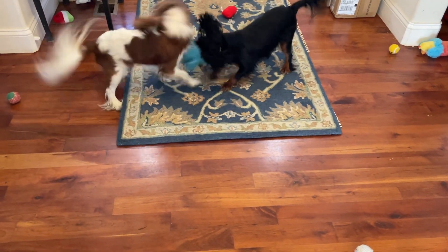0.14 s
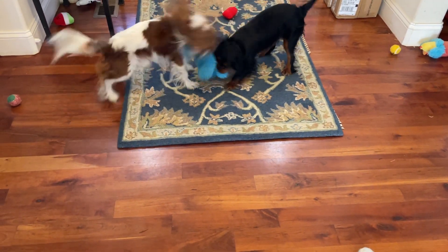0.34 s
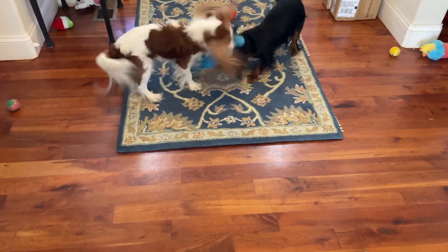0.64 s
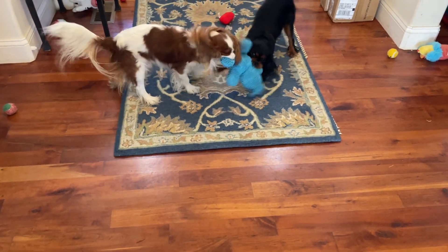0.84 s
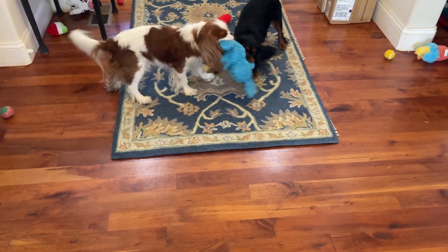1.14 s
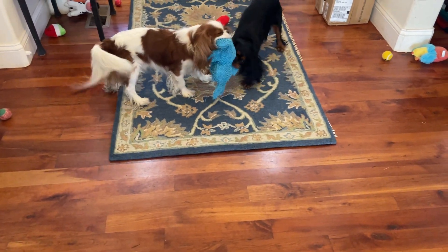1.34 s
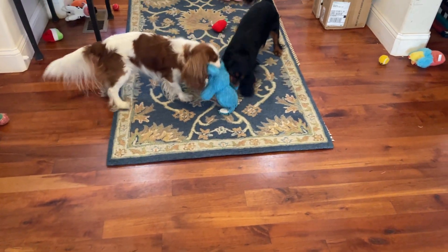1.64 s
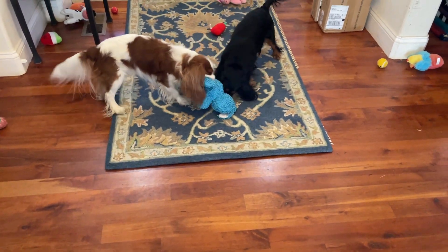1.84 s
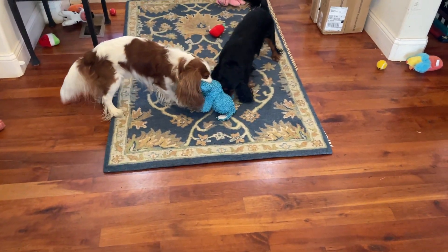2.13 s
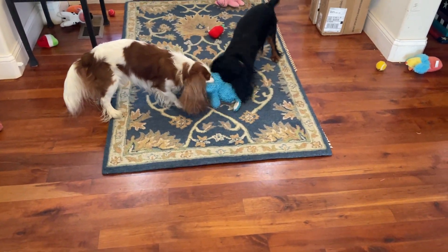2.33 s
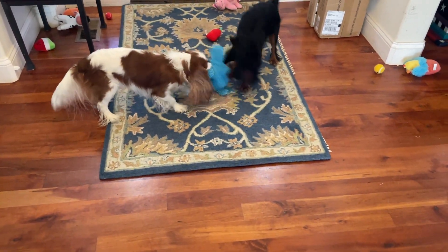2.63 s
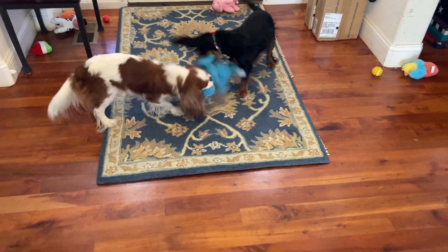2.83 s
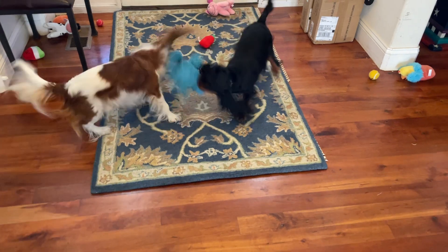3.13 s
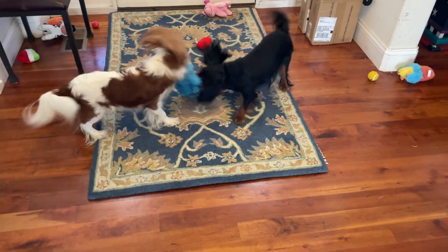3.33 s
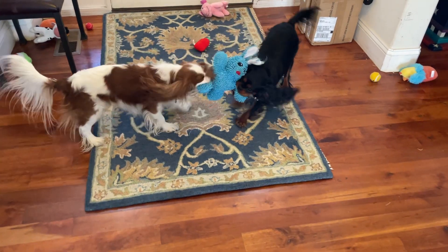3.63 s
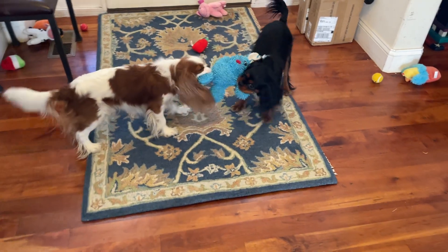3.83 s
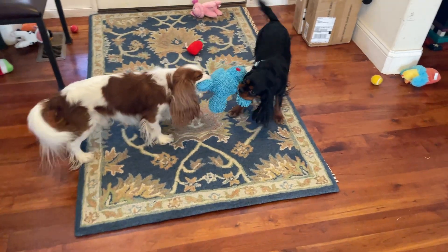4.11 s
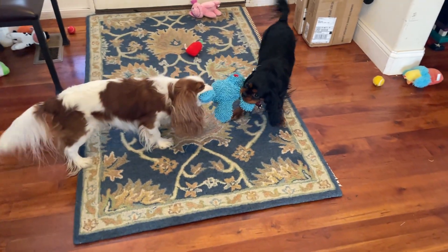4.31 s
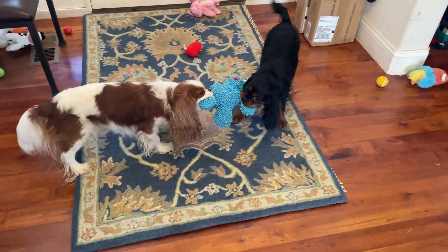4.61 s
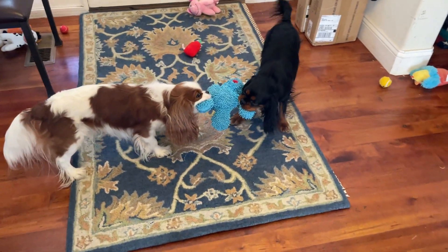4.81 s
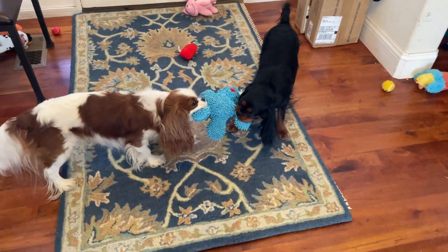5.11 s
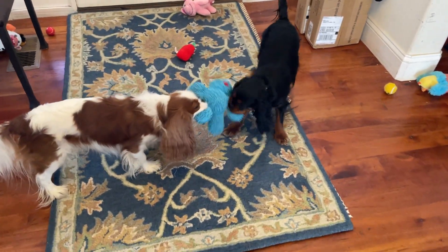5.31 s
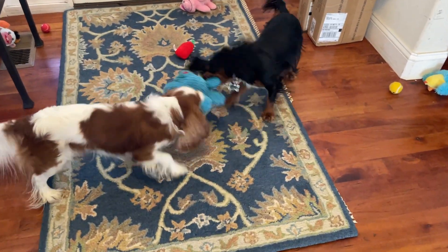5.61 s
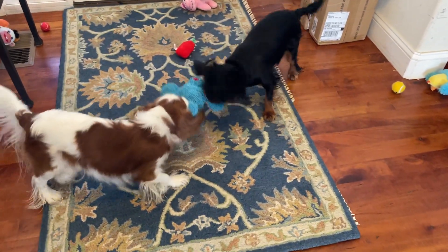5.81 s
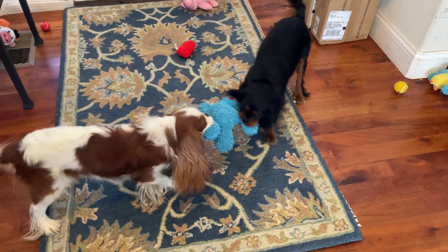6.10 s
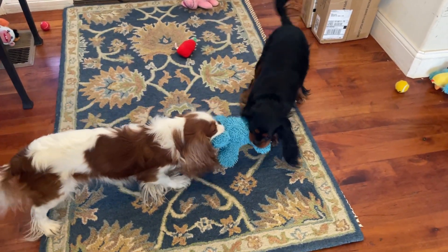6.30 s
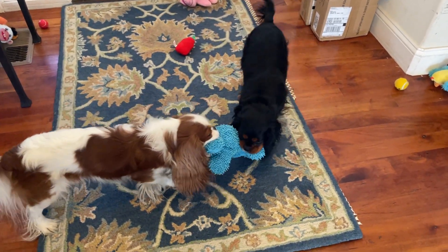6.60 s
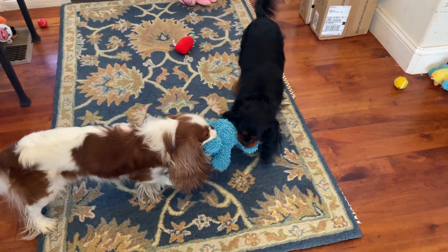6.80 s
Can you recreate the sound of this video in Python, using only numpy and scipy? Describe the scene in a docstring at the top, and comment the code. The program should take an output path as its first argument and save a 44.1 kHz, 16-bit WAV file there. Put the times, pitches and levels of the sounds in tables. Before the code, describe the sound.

Two small dogs play tug in a living room, heard from a few steps away with short room echo and faint low room tone. From 0 to 0.8 s, brisk rustling, bright collar-tag jingles, paw thumps and claw scuffs accompany short, rough, muffled growls. A lower throbbing growl runs from about 1.1 to 1.6 s with little movement, then a brief lull. Small grunts return at 2.2 to 2.6 s. Around 2.7 to 3.7 s comes the most vigorous tugging: strong raspy growls, a heavy soft thump, a sharp tag clash near 3.1 s and more rustle. From 3.9 to 4.7 s the growl is faint and low, followed by soft thumps and tiny claw taps and a near pause. Short growls resume at 5.3 s, then loud, sustained, throbbing growls from 5.7 to 6.6 s with jingles near 5.7 to 6.2 s, ending in weaker low grumbles.

```python
"""In a living room, two small dogs tug at a plush toy on a rug over a wooden floor.
One growls in long, low, throbbing bouts through a mouthful of toy: a chest tone and ragged slaps ring throat resonances.
As they shake their heads, metal collar tags jingle as decaying modes, and fur and plush rustle as grainy noise.
Paws thump as short low sines; claws tick, knock and scuff as brief noise bursts. Room tone and echo surround them."""
import sys
import numpy as np
from scipy import signal
from scipy.fft import rfft, irfft
from scipy.io import wavfile
from scipy.ndimage import uniform_filter1d

SR = 44100
rng = np.random.default_rng(int(sys.argv[2]) if len(sys.argv) > 2 else 0)


def dump(signal):
    """Clip the signal to [-1, 1] and save it as 16-bit WAV at the path in sys.argv[1]."""
    limited = np.clip(np.atleast_2d(signal).T, -1, 1)
    pcm = np.round(limited * 32767).astype(np.int16)
    wavfile.write(sys.argv[1], SR, pcm)


N = 306495


def from_db(db):
    """Decibels to gain."""
    return 10 ** (np.asarray(db) / 20)


def rms_one(x):
    """Scale to unit rms."""
    return x / np.sqrt(np.mean(x ** 2) + 1e-20)


def evened(x):
    """Hold a sound at a steady rms of 1."""
    return x / np.sqrt(np.abs(uniform_filter1d(x * x, size=1500)) + 1e-12)


def in_time(rows):
    """Each column of a curve at every sample."""
    s, *columns = np.transpose(rows)
    return [np.interp(np.arange(N) / SR, s, column) for column in columns]


def at_hz(points, hz):
    """Read a table on a log-frequency axis."""
    table_hz, values = np.transpose(points)
    return np.interp(np.log(hz), np.log(table_hz), values)


def drift(rate):
    """Smooth chance with about `rate` turns a second; spread 1."""
    step = 40   # samples between computed points
    r = np.exp(-2 * np.pi * step * rate / SR)
    white = rng.standard_normal(N // step + 2002)
    slow = signal.lfilter([1], [1, -2 * r, r * r], white)[2000:]
    return np.interp(np.arange(N) / step, np.arange(len(slow)), rms_one(slow))


def band(x, low, high, order=2):
    """Butterworth band-pass."""
    edges = [max(low, 10), min(high, .45 * SR)]
    return signal.sosfilt(signal.butter(order, edges, "band", fs=SR, output="sos"), x + 1e-18)


# Left-right likeness of diffuse sound: (frequency [Hz], correlation [-1 to 1])
LIKENESS = [(40, 1), (160, 0.85), (330, 0.64), (700, 0.37), (1500, 0.2), (3000, 0.56), (6000, -0.077),
            (16000, 0.48)]


def diffuse_bands(size, count=20):
    """Half-octave bands of stereo noise, alike on both sides in the bass: (Hz, noise)."""
    edges = 22 * 2 ** (np.arange(count + 1) / 2)
    white = rng.standard_normal((2, 2, size + 8000))
    for k, (low, high) in enumerate(zip(edges, edges[1:])):
        # neighbouring bands use different noise
        mid, side = band(white[k % 2], low, high)[:, -size:]
        hz = np.sqrt(low * high)
        alike = np.clip(at_hz(LIKENESS, hz), -1, 1)
        yield hz, np.sqrt(1 + alike) * mid + np.sqrt(1 - alike) * side * [[1], [-1]]


def coloured(spectrum, patchy_db, count=20):
    """Stereo noise of a given colour, each band swelling on its own; rms 1."""
    total = np.zeros((2, N))
    for hz, noise in diffuse_bands(N, count):
        total += from_db(at_hz(spectrum, hz) + patchy_db * drift(23)) * noise
    return rms_one(total)


def add(track, s, sound):
    """Mix a short sound in at time s."""
    start = max(round(s * SR), 0)
    track[start:start + len(sound)] += sound[:N - start]


# Colour of the room tone: (frequency [Hz], relative density [dB per Hz])
AIR = [(15, -36), (25, 2.5), (53, 3.5), (80, -4), (223, -2), (734, -20.5), (988, -13.5), (1290, -23),
       (3620, -30.5), (4490, -32.5), (6740, -36.5), (9320, -38.5), (16000, -52)]


def room_tone(level_db=-69):
    """Steady, mostly low room noise whose bands swell slightly."""
    return from_db(level_db) * coloured(AIR, patchy_db=2.5)


# One growl per push of air: (start [s], length [s], rise after the start [s], chest level [dB],
# fade [dB], roughness [0-1, clipped], open mouth re chest [dB], snarl re chest [dB],
# muzzle rasp re chest [dB], vowel at the start [Hz]); the part levels are trimmed in growl()
GROWLS = [(0, 0.13, 0.012, -55.5, -6.5, 0.88, -4, -10.5, -38, 353),
          (0.227, 0.11, 0.022, -38.5, 7, 0.58, -4, -9, -24, 318),
          (0.326, 0.091, 0.018, -45, -1, 0.68, -1, -15, -18.5, 320),
          (0.385, .14, 0.04, -40.5, -2.5, 0.24, -9.5, -10.5, -21.5, 440),
          (0.58, 0.23, 0.035, -46.5, 15, 0.56, -9, -15.5, -33, 450),
          (1.061, 0.13, 0.027, -44, -1, 0.34, -4, -11.5, -47, 840),
          (1.18, 0.088, 0.035, -41.5, 0, 0.55, -8, -10.5, -38.5, 630),
          (1.312, 0.3, 0.037, -44, 2, 0.44, -7.5, -15, -46, 740),
          (2.168, 0.14, 0.063, -54.5, -7, 0.25, -8.5, -15.5, -26.5, 380),
          (2.406, 0.049, 0.032, -46, 0, .2, -1.5, -9, -27, 391),
          (2.511, 0.045, .025, -49, 0, 0.42, -6, -8, -20.5, 380),
          (2.713, 0.16, 0.12, -35, 0.5, 0.63, -5, -8.5, -30.5, 546),
          (2.849, 0.09, 0.093, -37, 2.5, 0.42, 4, -7, -40, 710),
          (2.943, 0.035, 0.061, -43, 0, 0.53, 7.5, -16, -41, 402),
          (3.025, 0.099, 0.042, -44, -1, 1.1, -7, -11, -37, 354),
          (3.145, .16, 0.04, -32, 9, 0.22, -7, -9.5, -28.5, 460),
          (3.297, 0.38, 0.068, -43, -0.5, .55, -8, -9, -49, 480),
          (3.899, .18, 0.029, -54.5, 5, .35, -3, -10, -19, 439),
          (4.079, 0.23, 0.032, -52.5, -0.5, .35, -15.5, -16.5, -45.5, 466.4),
          (4.314, .35, 0.042, -56.5, 0.5, 0.19, -16, -19, -35, 407),
          (5.289, 0.068, 0.046, -39, 0.5, 0.49, -9, -7, -27, 342.8),
          (5.429, 0.077, .042, -44, -1.5, 0.58, -4.5, -6, -19.5, 329.6),
          (5.675, 0.38, 0.054, -32, 7.5, 0.3, -7, -11.5, -38.5, 789.2),
          (6.051, 0.034, .027, -39.5, -1.5, 0.62, -4.5, -3.5, -28.5, 710),
          (6.103, 0.15, 0.049, -34.5, -1, 0.47, -10, -12, -36, 730),
          (6.27, 0.36, 0.037, -34, 3.5, 0.21, -12.5, -15, -36, 520),
          (6.709, 0.068, .03, -44.5, 1, 0.4, -11.5, -18.5, -56, 800.5),
          (6.813, 0.097, 0.021, -45, 2.5, 0.27, -12, -16.5, -54, 878)]
# Pitch glide, one list per bout of growling: (time [s], pitch [Hz])
PITCH = [
    [(0.05, 176.6), (0.104, 197.1), (0.23, 200.7), (0.324, 191.8), (0.538, 199.7), (0.606, 172.6),
     (0.646, 193.5), (0.75, 193.7)],
    [(1.07, 136), (1.33, 130.5), (1.372, 125.7), (1.478, 140.5), (1.53, 124.7), (1.6, 140.3), (1.64, 128.7),
     (1.72, 127.7)],
    [(2.18, 157), (2.294, 167.4), (2.334, 156.5), (2.372, 159), (2.422, 187.4), (2.522, 208.8),
     (2.562, 195.4), (2.6, 195.8)],
    [(2.73, 191.3), (2.794, 195.2), (2.902, 223.9), (2.998, 199.3), (3.442, 195.2), (3.638, 162.5),
     (3.67, 139.4), (3.78, 139.3)],
    [(3.9, 144.2), (4.004, 144.2), (4.052, 163.9), (4.118, 160.7), (4.152, 140.4), (4.228, 141),
     (4.294, 150.8), (4.54, 139.6)],
    [(5.3, 180.5), (5.326, 182.1), (5.354, 193.5), (5.378, 198.2), (5.414, 198.2), (5.438, 208.5),
     (5.518, 181.6), (5.56, 183.3)],
    [(5.68, 178.9), (5.812, 179.5), (5.934, 163), (6.032, 158.3), (6.056, 155.5), (6.116, 155.4),
     (6.16, 180.7), (6.23, 183.4)],
    [(6.3, 152), (6.318, 150.4), (6.662, 145.7), (6.706, 135.4), (6.774, 132.6), (6.87, 141.1),
     (6.908, 125.5), (6.94, 122.8)],
]
ONSET_DB, RELEASE_DB_PER_S = 15.5, 187   # a growl swells from this far down, and dies at this rate
LIPS_SLACKEN_DB = 2   # the snarl and rasp weaken by this much over a growl
JAW_OCTAVES_PER_S = 0.56   # the vowel darkens as the jaw closes on the toy


def growl_controls():
    """Each growl swells, changes level while held and dies away; pitch glides and the jaw slowly closes."""
    t = np.arange(0, N / SR, .002)
    columns = np.transpose(GROWLS)[:, :, None]
    start, length, rise, db, fade, rough, mouth_db, snarl_db, muzzle_db, vowel_hz = columns
    age = np.clip(t - start, 0, length)
    onset = np.maximum(1 - (t - start) / rise, 0)
    overtime = np.maximum(t - start - length, 0)
    effort_db = -ONSET_DB * onset ** 2 - fade * age / length - RELEASE_DB_PER_S * overtime
    power = from_db(db + effort_db) ** 2 + 1e-20
    # the lips are drawn back at first and slacken towards the end
    lips_db = LIPS_SLACKEN_DB * (.5 - age / length)
    parts_db = (0, mouth_db, snarl_db + lips_db, muzzle_db + lips_db)
    levels = [np.sqrt(np.sum(power * from_db(part_db) ** 2, axis=0)) for part_db in parts_db]
    pitch = np.interp(t, *np.vstack(PITCH).T)
    jaw_hz = vowel_hz * 2 ** (-JAW_OCTAVES_PER_S * age)
    # where growls run into each other, the stronger one shapes the voice
    shape = [np.average(np.broadcast_to(control, power.shape), axis=0, weights=power)
             for control in (np.clip(rough, 0, 1), jaw_hz)]
    return in_time(np.transpose([t, *levels, pitch, *shape]))


def throat(source, resonances, top_hz):
    """Resonances in parallel with a steep fall above, evened to a steady rms of 1."""
    x = np.zeros(N)
    for hz, width, db in resonances:
        x += from_db(db) * band(source, hz - width / 2, hz + width / 2)
    return evened(signal.sosfilt(signal.butter(6, min(top_hz, .4 * SR), fs=SR, output="sos"), x))


def jaw_resonance(source, jaw_hz, width_hz=230):
    """One resonance that glides with the opening of the jaw, at a steady level."""
    turn = np.exp(2j * np.pi * np.cumsum(jaw_hz) / SR)
    r = np.exp(-np.pi * width_hz / SR)
    # shift the resonance to zero frequency, smooth there, and shift back
    smoothed = signal.lfilter([(1 - r) ** 2], [1, -2 * r, r * r], source / turn)
    return evened(np.real(turn * smoothed))


# Throat resonances, the muzzle's being faint and high:
# (centre [Hz], width [Hz], level within its group [dB])
CHEST = [(223, 93.6, 0)]
MOUTH = [(299.6, 50, 13), (456, 374, 10), (640, 180, -12.5), (802, 530, 5), (883, 620, -8)]
SNARL = [(1290, 150, -10), (1233, 393, 12), (1500, 170, -8)]
MUZZLE = [(1894, 298, 1.5), (2942, 640, 3), (5370, 1900, -7.5)]
# scale of the closure scatter, the turbulence per slap, and the buzz beside the chest tone
JITTER_CYCLES, BREATHINESS, CHEST_BUZZ = .11, 1.5, .42


def growl(chest, mouth, snarl, muzzle, pitch, rough, jaw_hz,
          waver=.008, throb_hz=25, throb=0.55, wobble=1.0, shimmer_db=5, limp=0.93,
          break_up_db=4, mouth_db=-4, jaw_db=-7, snarl_db=-2, muzzle_db=-1):
    """Slack folds flap unevenly: a throbbing chest tone, and a ragged train of slaps that rings the throat."""
    # closures come a little early or late around the gliding pitch
    glide = np.cumsum(pitch * (1 + waver * drift(12))) / SR
    cycles = np.maximum.accumulate(glide + 1 + JITTER_CYCLES * rough * drift(45))
    closures = cycles.astype(int)
    # loose tissue above the folds flutters and swells the flow in throbs
    flutter = 2 * np.pi * np.cumsum(throb_hz * (1 + 0.3876 * drift(9.95))) / SR
    swell = 1 + np.sqrt(rough) * throb * np.sin(flutter) + 0.18 * rough * drift(58)
    tone = np.sin(2 * np.pi * cycles + wobble * rough * np.cos(flutter)) * swell
    tone = tone / np.sqrt(uniform_filter1d(tone * tone, size=3000))
    # strong and weak closures alternate, each with a puff of turbulence
    chance = np.clip(rng.standard_normal(N), -2, 2)[closures]
    alternation = 1 + limp * np.sqrt(rough) * (-1) ** closures
    strength = from_db(shimmer_db * rough * chance) * alternation * swell
    puff = np.exp(-(cycles % 1) / 0.66) * rng.standard_normal(N) * np.sqrt(8 * pitch / SR)
    slaps = strength * (np.diff(closures, prepend=0) + BREATHINESS * (.1 + rough) * puff)
    buzz = CHEST_BUZZ * (.5 + rough) * throat(slaps, CHEST, top_hz=642)
    low = chest * (from_db(-break_up_db * rough) * tone + buzz)
    open_mouth = from_db(mouth_db) * throat(slaps, MOUTH, top_hz=1320)
    vowel = mouth * (open_mouth + from_db(jaw_db) * jaw_resonance(slaps, jaw_hz))
    snarling = snarl * from_db(snarl_db) * throat(slaps, SNARL, top_hz=1520)
    rasp = muzzle * from_db(muzzle_db) * throat(slaps, MUZZLE, top_hz=8230)
    return low, vowel + snarling + rasp


# Tugs and head shakes, levels before trims: (start [s], length [s], rustle [dB], tag jingle [dB],
# floor rumble [dB])
TUGS = [(0, 0.7, -53.5, -56, -58), (0.806, 0.096, -65, -59.5, -68), (1.033, 0.71, -83, -82, -69),
        (2.254, 0.16, -83, -108, -70), (2.386, 0.15, -74, -104, -58.5), (2.62, 0.18, -59.5, -53.5, -55.5),
        (2.864, 0.48, -54, -73, -49), (3.474, 0.3, -61.5, -66.5, -59), (3.858, 0.19, -70.5, -96, -62),
        (4.157, 0.43, -86, -106, -62), (4.83, 0.13, -79, -99, -68.5), (5.318, 0.24, -74, -105, -57.5),
        (5.572, 0.37, -65, -55, -66), (6.159, 0.36, -73.5, -72.5, -73)]
TUG_RISE_S, TUG_SETTLE_S = 0.0099, 0.075   # a tug builds up and settles
TUG_UNEVEN_DB, TUG_JERKS_PER_S = 2.5, 7.6   # and is jerky while it lasts


def tugging():
    """Strength of rustle, jingle and floor rumble: each tug builds up, jerks about and settles."""
    t, strength = np.arange(N) / SR, np.zeros((3, N))
    for s, length, *db in TUGS:
        build_up = np.clip((t - s) / TUG_RISE_S + 1, 0, 1)
        settle = np.exp(-np.maximum(t - s - length, 0) / TUG_SETTLE_S)
        strength += from_db(db)[:, None] * build_up * settle
    return strength * from_db(TUG_UNEVEN_DB * drift(TUG_JERKS_PER_S))


# Colours of the rubbing and of the deep rumble: (frequency [Hz], relative density [dB per Hz])
RUSTLE = [(300, 5), (900, -2.5), (1800, -6), (2600, -7.5), (4500, -5.5), (7000, -10), (10000, -9.5),
          (13000, -15.5), (16500, -28)]
RUMBLE = [(22, -67.5), (42, -7.5), (75, 17.5), (105, 15.5), (160, 13.5), (300, -46.5)]


def scuffle(rustle, rumble, rustle_db=-1, grain_db=2.0):
    """Fur and plush rub in uneven grains of changing colour over a deep rumble."""
    grains = rustle * from_db(rustle_db + grain_db * drift(69))
    rub = grains * coloured(RUSTLE, patchy_db=3.5)
    return rub + rumble * coloured(RUMBLE, patchy_db=3.0, count=9)


# Collar tags clash, levels before trims: (time [s], level [dB], lowest modes re the rest [dB],
# highest modes re the rest [dB])
CLASHES = [(0.056, -62, -10, -6), (0.128, -38.5, 7, -6), (.193, -37, -12, 3), (0.368, -45, -8, 3),
           (0.407, -41.5, -8, 5), (0.459, -40.5, -25, -16), (0.4824, -42, -20, -16), (.498, -39.5, 6, 0),
           (0.617, -44, 19, 9), (0.6476, -36.5, -6, 5), (0.737, -45.5, -31.5, -10), (0.869, -44.5, 10, 3),
           (1.066, -55, 3, 3), (1.571, -68, -3, -19), (1.7583, -60, -21, 4), (2.582, -54.5, -22, 6),
           (2.7058, -50.5, -18, -17), (2.859, -35, -1, -2), (2.925, -39.5, -1, -11),
           (3.056, -27.5, -47, -10), (3.161, -42.5, -22, 6), (3.2, -52.5, 9, -9), (3.2314, -40.5, 8, -10),
           (3.3057, -35, -9, 7), (3.348, -40.5, -1, -11), (3.602, -46.5, 8, 0), (3.724, -43.5, 19.5, 0),
           (5.583, -62, -24, 7), (5.7137, -38.5, 7, 3), (5.835, -43.5, 7, 13), (5.9188, -34.5, -9, 0),
           (6.0332, -44, -12, -7), (6.18, -56, -19, 9), (6.2414, -54, -16, 3), (6.523, -63.5, -14.5, -7)]
# Ringing modes of the tags: (frequency [Hz], level [dB], t60 [s], phase between left and right [rad])
TAGS = [(7400, -7, 0.02441, 3.9), (6900, -13, .01, 2.4), (9660, -3, 0.0582, 1.25),
        (9116, -12, 0.01507, 0.7684), (9780, -14, 0.037, 0.97), (10340, 1.5, 0.0083, 0.57),
        (11140, -10.5, .02, 1.0), (12500, -11.5, 0.0045, 2.07), (15570, -4.5, 0.039, 2.565),
        (15750, -2, 0.055, 3.1)]
LOW_MODES_HZ, HIGH_MODES_HZ = 8000, 13000   # lowest modes lie below the first, highest above the second


def tags(shaking, per_s=60, clash_db=-4, bounce_db=-8.0, bounce_s=0.0062,
         scrape_db=-17, scrape_s=0.0038, hard_db=12, vary_db=4, unsettle=0.94):
    """Tags clash and rebound, and chatter lightly in between; every touch excites the modes differently."""
    uneven_db = 1.56 * np.clip(rng.standard_normal(N), -2, 2)
    chatter = (rng.random(N) < per_s / SR) * shaking * from_db(uneven_db)
    s, peak_db, low_db, high_db = np.transpose(CLASHES)
    first = (s * SR).astype(int)
    # three rebounds per clash, at uneven gaps around bounce_s
    delays_s = np.cumsum(rng.uniform(0.56, 1.1, (len(s), 3)), axis=1) * bounce_s
    rebounds = np.minimum(first[:, None] + (delays_s * SR).astype(int), N - 1)
    out, contact = np.zeros((2, N)), chatter.copy()
    contact[first] += from_db(peak_db + hard_db)
    contact[rebounds[:, 0]] += from_db(peak_db + hard_db + bounce_db)
    for hz, db, t60, phase in TAGS:
        touches = chatter * rng.standard_normal(N)
        tilt_db = low_db * (hz < LOW_MODES_HZ) + high_db * (hz > HIGH_MODES_HZ)
        size = from_db(peak_db + clash_db + tilt_db + vary_db * rng.standard_normal(len(s)))
        touches[first] += size
        touches[rebounds] += size[:, None] * from_db(bounce_db) * rng.standard_normal(rebounds.shape)
        pole = np.exp(-np.log(1000) / (t60 * SR) + 2j * np.pi * hz / SR)
        ringing = from_db(db) * signal.lfilter([1], [1, -pole], touches + 1e-18)
        # tags lying against each other unsettle the ring
        turn = .5 * phase * np.array([[1], [-1]]) + unsettle * drift(70)
        out += np.imag(ringing * np.exp(1j * turn))
    # the edges scrape for a moment at chatter, clashes and first rebounds
    scrape = signal.lfilter([1], [1, -np.exp(-1 / (scrape_s * SR))], contact + 1e-18)
    scrape = scrape * rng.standard_normal((2, N))
    return out + from_db(scrape_db) * band(scrape, 3600, 15100, order=1)


# Paws land, levels before a trim: (time [s], level [dB], pitch [Hz])
THUMPS = [(0.009, -38.5, 77.5), (0.198, -40.5, 83), (0.335, -39, 84), (0.738, -51, 81.5), (0.862, -56, 120),
          (2.621, -64, 75.2), (2.802, -32.5, 121.6), (3.068, -42, 101.9), (3.503, -35, 147.9),
          (4.552, -36.5, 103.7), (4.636, -47, 131.3)]


def paws(decay_s=0.02, rise_s=0.00096, level_db=1):
    """The rug softens each footfall into a short boom of the boards."""
    out, t = np.zeros(N), np.arange(SR // 3) / SR
    envelope = (1 - np.exp(-t / rise_s)) * np.exp(-t / decay_s)
    for s, db, hz in THUMPS:
        add(out, s, from_db(db + level_db) * np.sin(2 * np.pi * hz * t) * envelope)
    return out


def taps(rows, level_db):
    """Short contacts, each a dying burst around its own centre: rows (s, dB, Hz, decay s, spread)."""
    out, t = np.zeros(N), np.arange(SR // 6) / SR
    for s, db, hz, decay_s, spread in rows:
        noise = rng.standard_normal(len(t))
        burst = rms_one(band(noise, hz / (1 + spread), hz * (1 + spread)))
        add(out, s, from_db(db + level_db) * burst * np.exp(-t / decay_s))
    return out


# Claws and teeth tick, levels before a trim: (time [s], level [dB], centre [Hz])
TICKS = [(0.1298, -35, 4440), (0.6418, -41, 5750), (0.7384, -42.5, 5270), (0.865, -50, 6580),
         (0.941, -49, 6240), (1.068, -58, 3270), (2.2159, -65, 3513), (2.6998, -52, 3830),
         (3.0545, -49, 3240), (3.305, -42, 4152), (4.5103, -67, 2067), (4.8503, -54.5, 2272),
         (4.9302, -53, 2320), (4.956, -70, 2700), (5.9127, -44, 4973)]
# Light knocks on the boards, levels before a trim: (time [s], level [dB], centre [Hz])
KNOCKS = [(0.857, -51.5, 579), (4.54, -56, 631), (4.608, -63, 1278), (4.792, -64.5, 798), (4.845, -64, 660),
          (5.129, -66.5, 640), (5.567, -53, 757.4), (5.611, -46.5, 636)]
# Claws scuff over the rug, levels before a trim: (time [s], level [dB], centre [Hz], decay [s],
# spread above and below the centre [fraction])
SCUFFS = [(.495, -27, 3760, 0.0052, 0.57), (.615, -33, 4832, 0.0044, 0.13),
          (3.343, -37.5, 4800, 0.012, 0.13), (3.478, -37, 4961, 0.0074, 0.088),
          (4.052, -46.5, 3250, 0.017, 1.57), (4.606, -49.5, 2775, 0.016, 1.424),
          (5.608, -44, 2820, 0.017, 0.6)]


def claws(tick_s=0.0022, knock_s=0.0042, tick_spread=0.28, knock_spread=0.57):
    """Sharp ticks, duller knocks and longer scuffs, all bursts of banded noise."""
    ticks = taps([(*row, tick_s, tick_spread) for row in TICKS], level_db=-4)
    knocks = taps([(*row, knock_s, knock_spread) for row in KNOCKS], level_db=4.5)
    return ticks + knocks + taps(SCUFFS, level_db=-12.5)


# Decay of the room's echo: (frequency [Hz], t60 [s])
ROOM_T60 = [(100, 0.63), (500, 0.26), (2000, 0.31), (6000, 0.15), (16000, 0.082)]


def room_response():
    """A diffuse tail of unit energy, dying sooner in the treble, with narrow peaks and dips evened out."""
    t = np.arange(SR // 2) / SR
    tail = sum(noise * from_db(-60 * t / at_hz(ROOM_T60, hz)) for hz, noise in diffuse_bands(len(t)))
    fade_in = np.clip((t - .003) / 0.0021, 0, 1)
    spectrum = rfft(tail * fade_in, SR)
    power = np.abs(spectrum) ** 2
    # bring narrow peaks and dips towards the broader spectrum
    broad, narrow = uniform_filter1d(power, size=300), uniform_filter1d(power, size=9)
    smoothing = np.abs(broad / (narrow + 1e-9))
    tail = irfft(spectrum * np.sqrt(smoothing))[:, :len(t)]
    return rms_one(tail) / np.sqrt(len(t))


THROB_RUMBLE_DB = -16.5   # deep rumble of the throbbing, re the chest level
CHEST_ROOM_DB, VOICE_ROOM_DB = -15, -3.5   # sends into the room


def scene():
    """The dogs a few steps away, with the room answering."""
    controls = growl_controls()
    chest, voice = growl(*controls)
    rustle, shaking, footing = tugging()
    jingle, thumps, contacts = tags(shaking), paws(), claws()
    rumble = np.hypot(from_db(1.0) * footing, from_db(THROB_RUMBLE_DB) * controls[0])
    sent = from_db(CHEST_ROOM_DB) * chest + from_db(VOICE_ROOM_DB) * voice
    sent = sent + from_db(-7.5) * thumps + from_db(-2) * jingle + contacts
    room = signal.fftconvolve(sent, room_response(), axes=1)[:, :N]
    # direct voice: 0.8 dB up in the first channel, 0.8 dB down in the second
    stereo_voice = from_db(-2.5) * voice * from_db([[.8], [-.8]])
    direct = chest + stereo_voice + thumps + jingle + contacts
    return direct + room + scuffle(rustle, rumble) + room_tone()


def record(dry):
    """The microphone drops the deepest bass; the top is cut steeply."""
    dry = signal.sosfilt(signal.butter(4, 36, "high", fs=SR, output="sos"), dry)
    return signal.sosfilt(signal.ellip(10, .2, 80, 16300, fs=SR, output="sos"), dry)


dry = scene()
out = record(dry)
dump(out)
```